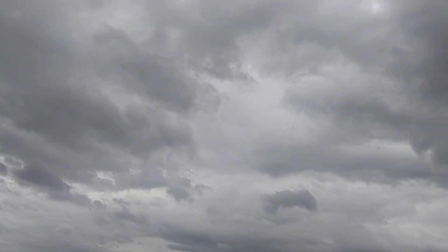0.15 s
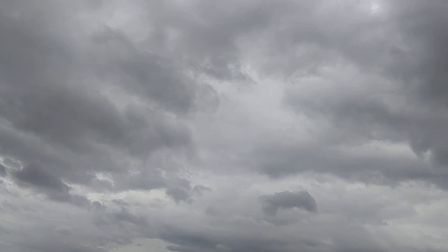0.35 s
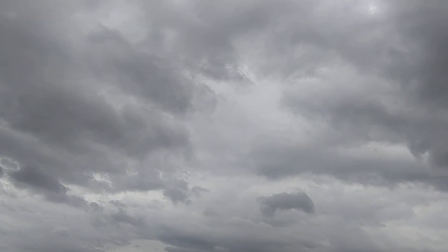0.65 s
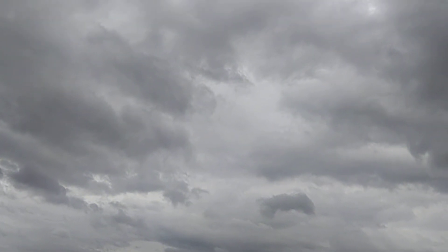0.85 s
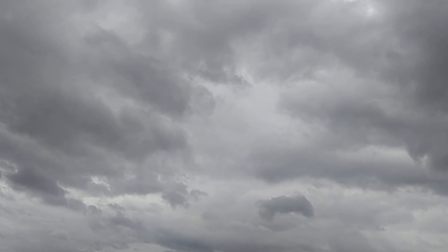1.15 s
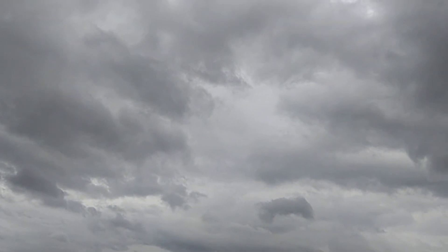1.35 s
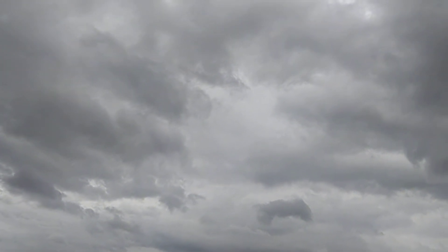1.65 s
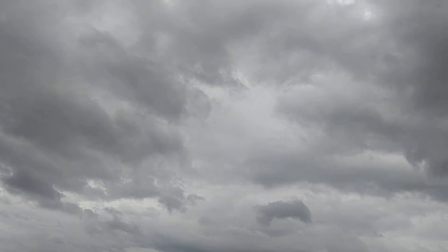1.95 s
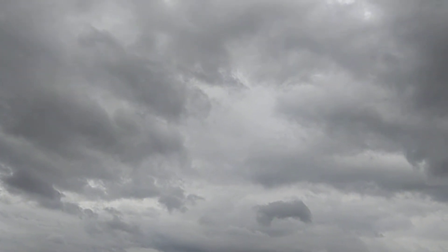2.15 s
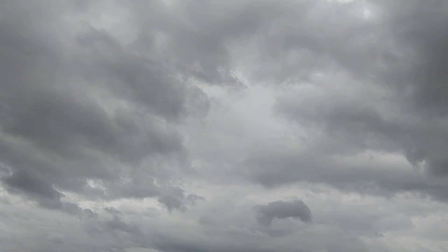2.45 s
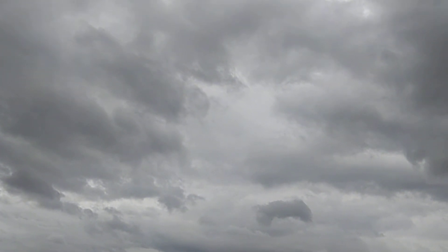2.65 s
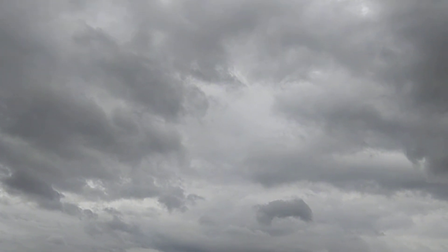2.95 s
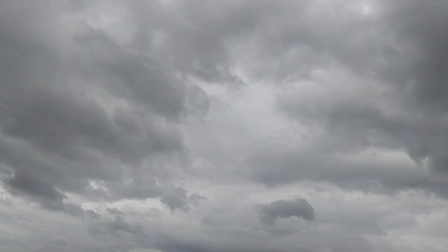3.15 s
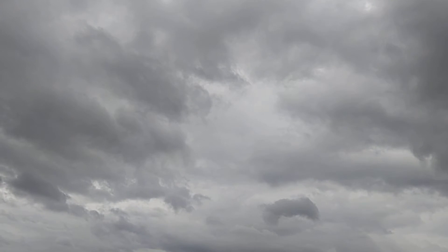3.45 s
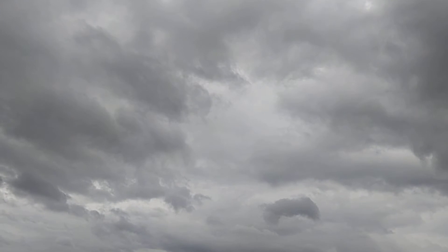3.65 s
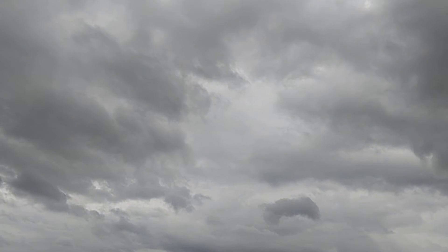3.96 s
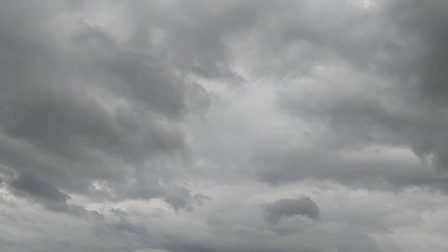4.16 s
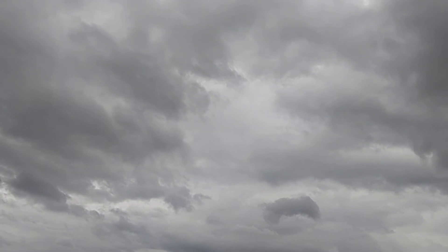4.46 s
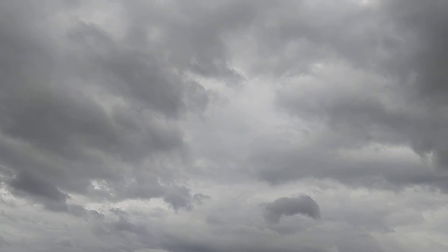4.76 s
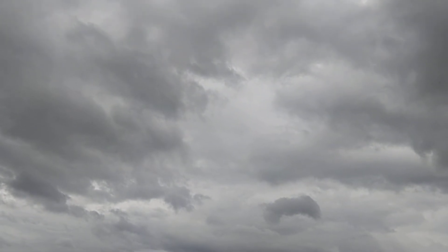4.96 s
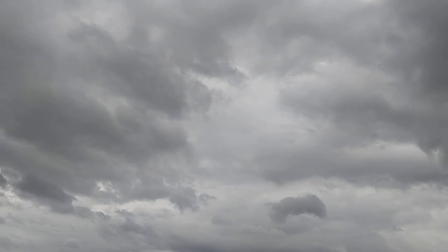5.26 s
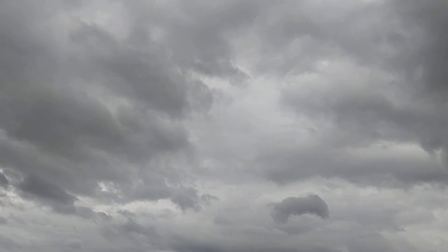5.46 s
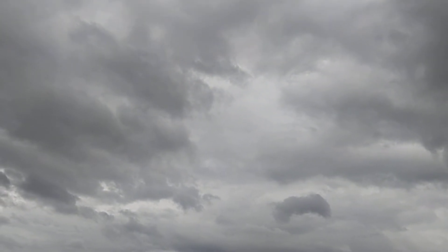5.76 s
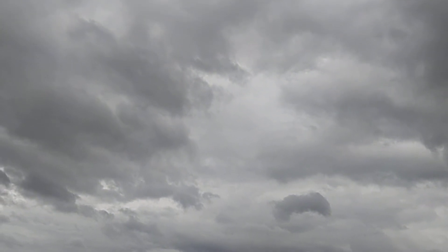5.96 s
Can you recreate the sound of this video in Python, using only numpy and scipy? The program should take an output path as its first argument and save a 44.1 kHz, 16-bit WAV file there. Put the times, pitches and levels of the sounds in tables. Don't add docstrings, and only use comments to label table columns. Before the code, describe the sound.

Gusty wind batters a bare outdoor microphone with deep thumps, flutter and clipped crackle, while leaves hiss and a distant machine hums faintly.

```python
import sys
import numpy as np
from scipy import signal
from scipy.fft import rfft, irfft, next_fast_len
from scipy.io import wavfile
from scipy.ndimage import uniform_filter1d, map_coordinates

SR = 44100
rng = np.random.default_rng(int(sys.argv[2]) if len(sys.argv) > 2 else 0)


def file_out(sig):
    cols = np.atleast_2d(sig).T
    lim = np.clip(cols, -1, 1)
    pcm = np.round(lim * 32767).astype(np.int16)
    wavfile.write(sys.argv[1], SR, pcm)


def ratio(d):
    e = np.asarray(d, float) / 20
    return 10 ** e


N = 268745

# time in seconds, strength in dB.
WIND = [(0, -51), (.25, -56), (.52, -59.5), (.78, -49.5), (1.14, -33.5), (1.25, -26), (1.6, -25.5),
        (1.83, -30.5), (2.05, -31.5), (2.4, -38.5), (2.96, -42), (3.15, -35), (3.5, -34.5), (4.3, -39),
        (4.38, -29), (4.78, -22), (5.25, -28), (5.85, -38)]
# time in seconds, strength in dB.
FLOW = [(0, -67), (.15, -38.5), (.65, -40), (.9, -38), (1.15, -36), (1.32, -15), (1.5, -26), (1.75, -23),
        (1.85, -33.5), (2.15, -33), (2.6, -38.5), (3.8, -41), (4.15, -24.5), (4.85, -29), (5.15, -43),
        (5.55, -42), (5.95, -27.5), (6.09, -31)]
MIDDLE_DB = -35
# centre in Hz, width in Hz, depth in dB.
PORT = [(3800, 320, -1.5), (5770, 220, -3.5)]


def unit(x):
    return x / np.sqrt(np.mean(x ** 2) + 1e-20)


def curves(rows):
    s, *cols = np.transpose(rows)
    return [np.interp(np.arange(N) / SR, s, c) for c in cols]


def wobble(rate):
    knots = rng.standard_normal(200 + int(N * 60 / SR))
    return map_coordinates(knots, [np.arange(N) * rate / SR])


def bumps(s, size, half):
    t = np.arange(0, N / SR + .002, .001)
    bells = np.exp(-.5 * ((t - np.c_[s]) / np.c_[half]) ** 2)
    return np.interp(np.arange(N) / SR, t, size @ bells)


def patches(shape, bins, frames):
    field = uniform_filter1d(rng.standard_normal(shape), size=bins, axis=0)
    return unit(uniform_filter1d(field, size=frames, axis=1))


def rush(spectrum, patchy_db=0.):
    z = signal.stft(rng.standard_normal(N + 512), nperseg=512)[2]
    gain = ratio(patchy_db * patches(z.shape, bins=8, frames=10))
    noise = signal.istft(z * gain, nperseg=512)[1]
    m = next_fast_len(N + 8192)
    f, level = np.transpose(spectrum)
    colour = np.interp(np.log(np.fft.rfftfreq(m, 1 / SR) + 0.088), np.log(f), level, left=-120)
    return unit(irfft(rfft(noise, m) * ratio(colour), m)[:N])


def even(x, span):
    power = np.abs(uniform_filter1d(x ** 2, size=int(span * SR)))
    return unit(x / np.sqrt(power + 0.056))


def far():
    # Hz, level in dB per Hz.
    far_colour = [(40, -3), (90, -17.5), (200, -3), (400, -10), (800, -12), (1300, -14.5), (2500, -18),
                  (4000, -23.5), (6000, -31), (8300, -24.5), (11000, -53), (16000, -31.5)]
    return ratio(-50 + 0.32 * wobble(3.5)) * rush(far_colour, patchy_db=0.05)


def machine():
    # multiple of the shaft rate, level in dB.
    orders = [(3, -75), (4, -57), (5, -62), (8, -47), (9, -79), (10, -65), (12, -65.5), (13, -65),
              (15, -85), (16, -74), (17, -74)]
    shaft_hz = 34.01
    turn = 2 * np.pi * np.cumsum(shaft_hz + 0.018 * wobble(1.44)) / SR
    hum = 0
    for k, db in orders:
        level = ratio(db + 3 + .8 * wobble(3))
        hum = hum + level * np.sin(k * turn + rng.uniform(0, 2 * np.pi))
    return hum


def whistle():
    # start in seconds, end in seconds, pitch in Hz, level in dB, waver in Hz.
    gust_tones = [
        (1.6, 2.35, 4045, -56, 1),
        (1.9, 2.35, 4001, -57, 1),
        (2.6, 2.9, 4045, -64, 1),
        (3.8, 3.94, 14390, -52, 12),
        (3.75, 4.15, 4044, -62, 1),
        (5.15, 6.09, 4001, -61, 1),
    ]
    t, tones = np.arange(N) / SR, 0
    for start, end, hz, db, waver_hz in gust_tones:
        swell = np.sin(np.pi * np.clip((t - start) / (end - start), 0, 1)) ** .5
        phase = 2 * np.pi * np.cumsum(hz + waver_hz * wobble(20)) / SR
        tones = tones + ratio(db) * swell * np.sin(phase)
    return tones


def leaves():
    # Hz, level in dB per Hz.
    hiss_colour = [(2000, -47), (3500, -11), (5200, -6.5), (6500, -3), (8300, 2.5), (10900, -1.5),
                   (13500, 5.5), (15000, 1.5), (15700, 6), (16500, -0.5)]
    rustle_colour = [(350, -19), (600, -15.5), (899, -11.5), (1360, -8.5), (2040, -4), (4030, -6.5),
                     (4500, -8.5), (5850, -6), (9900, -120)]
    # time in seconds, change in dB, half length in seconds.
    puffs = [(0.325, 6, 0.018), (.6, -3, .04), (0.673, 2, .015), (0.715, -7, 0.017), (.87, 0, .03),
             (.98, 2.5, .04), (1.334, 1.5, .015), (1.64, 2.5, 0.036), (2.32, -1.5, 0.029), (2.687, 2, .02),
             (2.882, 1.5, 0.014), (3.235, -4, 0.017), (3.413, 1.5, 0.066), (3.537, -1.5, 0.026),
             (3.61, 2.5, 0.018), (3.93, -11.5, 0.083), (4.11, 1.5, .04), (4.671, 5, 0.033), (4.73, 0, .02),
             (4.835, 5, 0.014), (4.9, 2.5, 0.015), (5.04, -1, 0.027), (5.195, 1, 0.083), (5.4, 3.5, 0.021),
             (5.55, -1.5, 0.026), (5.628, 3.5, 0.018), (5.8, 1, 0.025), (5.993, 2, 0.068),
             (6.09, 6.5, 0.033)]
    wind_db, = curves(WIND)
    puff_db = bumps(*np.transpose(puffs)) + 0.55 * wobble(13) + 0.76 * wobble(45)
    rustle_db = -45 + 0.86 * (wind_db - MIDDLE_DB) + 0.73 * puff_db
    hiss = ratio(wind_db + puff_db) * rush(hiss_colour, patchy_db=0.56)
    return hiss + ratio(rustle_db) * rush(rustle_colour, patchy_db=0.34)


def buffet():
    # Hz, level in dB per Hz.
    thump_colour = [(12, -38), (22, 6.5), (50, 4.5), (80, -12.5), (130, -52.5)]
    flutter_colour = [(50, -15), (90, 1.5), (200, -9.5), (450, -27), (800, -46), (1500, -43)]
    crackle_colour = [(110, -12), (180, 3), (350, 0), (600, -15.5), (1000, -20)]
    # time in seconds, thump in dB, flutter in dB, half length in seconds.
    eddies = [(0.192, -37, -51, .02), (0.387, -48, -56, 0.017), (0.722, -39, -48, 0.016),
              (.77, -36, -42, 0.02), (0.917, -30, -53, 0.017), (1.147, -30, -38.5, 0.033),
              (1.285, -28, -21.5, 0.026), (1.345, -11, -21, 0.061), (1.584, -29, -19, 0.031),
              (1.714, -15, -27.5, 0.035), (1.91, -34, -43, 0.026), (2.154, -30, -45, .03),
              (3.897, -27, -37, 0.025), (4.0, -28, -35.5, 0.02), (4.05, -28, -32, 0.013),
              (4.426, -21, -38, 0.028), (4.564, -8.5, -30, .025), (4.666, -21, -32, 0.043),
              (4.95, -27, -39, 0.026), (5.05, -29, -41, 0.027), (5.712, -36, -45, 0.033),
              (6, -44, -30.5, 0.031), (6.07, -32, -38, 0.036)]
    flow_db, = curves(FLOW)
    s, thumps_db, flutters_db, half = np.transpose(eddies)

    steady_power = ratio(1.852 * (flow_db - 3.5 + 1.4 * wobble(9.9)))
    thump_size = np.sqrt(steady_power + bumps(s, ratio(2 * thumps_db), 0.75 * half))
    thump = thump_size * even(rush(thump_colour), span=0.104)

    calm_db = -47.5 + 0.23 * (flow_db - MIDDLE_DB) + wobble(12)
    flutter_db = 10 * np.log10(ratio(2 * calm_db) + bumps(s, ratio(2 * flutters_db), 0.78 * half))
    flutter = even(ratio(1.2 * wobble(49)) * rush(flutter_colour), span=0.075)

    crackle_db = -33.5 + 1.27 * (flutter_db + 22.0)
    crackle = even(ratio(15 * wobble(55)) * rush(crackle_colour), span=0.01)
    return thump, ratio(flutter_db - 6.0) * flutter + ratio(crackle_db) * crackle


def heave():
    # Hz, level in dB per Hz.
    swing_colour = [(1, 6), (3, 11.5), (6, 5.5), (12, -12), (20, 0.5), (30, -49.5)]
    wind_db, flow_db = curves(WIND)[0] - MIDDLE_DB, curves(FLOW)[0] - MIDDLE_DB
    return ratio(-28 + 0.42 * wind_db + .25 * flow_db) * even(rush(swing_colour), span=0.49)


def surges():
    # peak in seconds, pressure of full scale, rise in seconds, fall in seconds.
    pushes = [(.782, -.09, .04, .006), (.822, .11, .02, .018), (.892, -.08, .025, .006),
              (.925, .16, .015, .025), (1.153, -.17, .03, .02), (1.241, .38, .006, .006),
              (1.265, -.55, .011, .009), (1.297, 1.08, .011, .013), (1.319, .22, .005, .009),
              (1.354, -.62, .013, .005), (1.371, -.72, .007, .009), (1.403, -1.35, .0085, .0095),
              (1.433, 1.3, .012, .030), (1.484, .25, .011, .008), (1.58, -.4, .025, .015),
              (1.632, .56, .018, .017), (1.71, -.6, .022, .008), (1.772, -.38, .015, .03),
              (4.063, .25, .02, .04), (4.155, -.35, .015, .05), (4.34, .3, .06, .03), (4.46, -.3, .04, .05),
              (4.553, -.6, .008, .016), (4.601, .5, .01, .007), (4.62, .5, .025, .035),
              (4.785, .28, .025, .03), (4.89, -.36, .04, .025), (5.7, -.21, .01, .012),
              (5.988, -.2, .008, .01), (6.065, .24, .015, .05)]
    t, pressure = np.arange(N) / SR, 0
    for s, peak, rise, fall in pushes:
        pressure = pressure + peak * np.exp(-.5 * ((t - s) / np.where(t < s, rise, fall)) ** 2)
    return pressure


def swells():
    # time in seconds, pressure of full scale, half length in seconds.
    gentle = [
        (1.98, .12, .06),
        (3.16, .11, .03),
        (3.315, -.1, .035),
        (3.41, .1, .03),
        (4.99, .14, .04),
    ]
    return bumps(*np.transpose(gentle))


def wind():
    push = surges() + swells()
    thump, flutter = buffet()
    sweep = 1 + (uniform_filter1d(np.abs(push), size=2600) / .16) ** 2
    return push + (heave() + thump) / sweep + flutter


def housing(x):
    hz = np.fft.rfftfreq(N, 1 / SR)
    dips_db = sum(db * np.exp(-.5 * ((hz - centre) / width) ** 2) for centre, width, db in PORT)
    return irfft(rfft(x) * ratio(dips_db), N)


def gaps(x, share):
    hz, _, z = signal.stft(x, SR, nperseg=1024)
    field = patches(z.shape, bins=3, frames=4)
    nearness = sum(np.exp(-.5 * ((hz - centre) / 450) ** 2) for centre, _, _ in PORT)
    kept = np.where(field < -3.2 + share * nearness[:, None], .03, 1)
    return signal.istft(z * kept, SR, nperseg=1024)[1][:N]


def split(mono):
    split_s = [.158, .367, .413, 1.249, 1.528, 1.528, 1.667, 1.853, 1.853, 1.969, 2.364, 2.364, 2.805,
               3.107, 3.107, 3.13, 3.293, 4.152, 4.152, 4.477, 4.477, 4.686, 4.709, 4.988, 5.336, 5.661,
               5.94]
    size = 2048
    side = np.zeros(N + size)
    hz = np.fft.rfftfreq(size, 1 / SR)
    window = signal.windows.kaiser_bessel_derived(size, 4 * np.pi)
    for s in split_s:
        at = round(s * SR) - size // 2
        low_hz, width_hz = rng.uniform(5000, 14900), rng.uniform(900, 2000)
        band = rfft(mono[at:at + size]) * ((hz > low_hz) & (hz < low_hz + width_hz))
        scrambled = irfft(band * np.exp(2j * np.pi * rng.random(len(hz))))
        side[at:at + size] += ratio(-3.0) * window ** 2 * scrambled
    return side[:N]


def scene():
    return np.tile(far() + machine() + whistle() + leaves() + wind(), (2, 1))


def low_pass(x):
    return signal.sosfilt(signal.butter(12, 16520, fs=SR, output="sos"), x)


def record(dry):
    full, top_hz = .707, 15770
    flat = np.clip(gaps(housing(dry[0]), share=2.2), -full, full)
    pair = flat + [[1], [-1]] * split(flat)
    pair = irfft(rfft(pair) * (np.fft.rfftfreq(N, 1 / SR) < top_hz), N)
    return low_pass(pair)


dry = scene()
out = record(dry)
file_out(out)
```